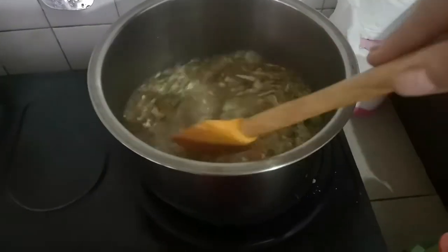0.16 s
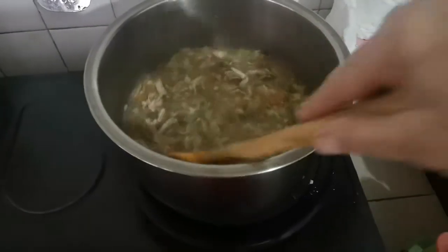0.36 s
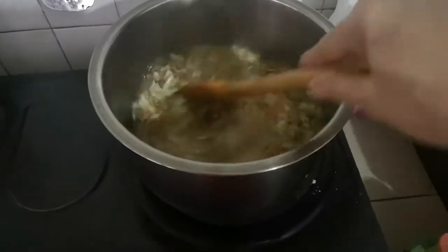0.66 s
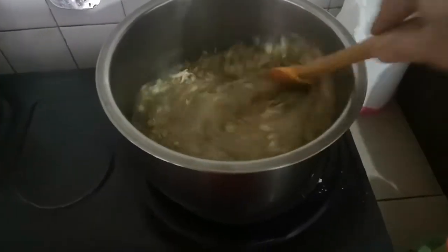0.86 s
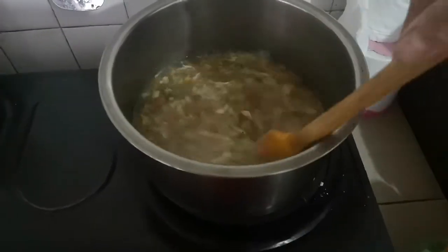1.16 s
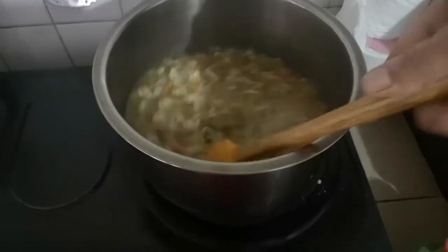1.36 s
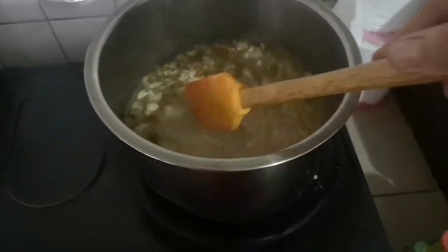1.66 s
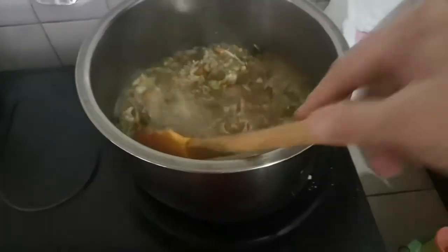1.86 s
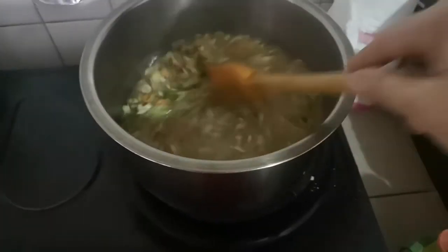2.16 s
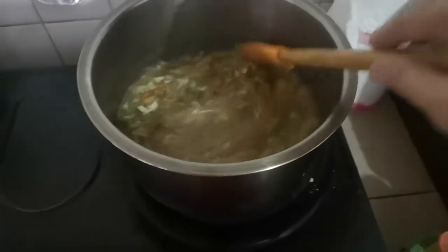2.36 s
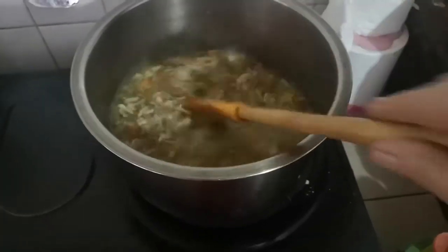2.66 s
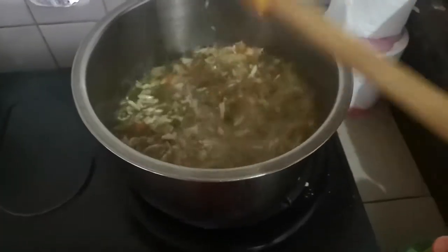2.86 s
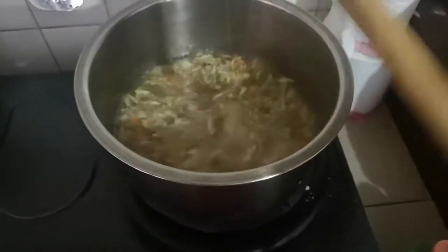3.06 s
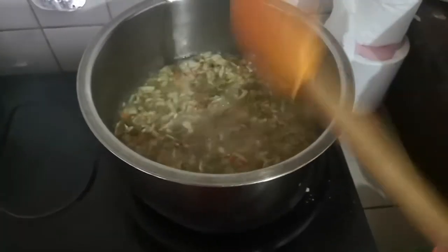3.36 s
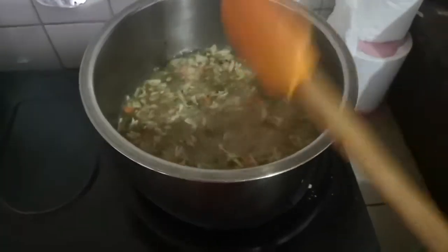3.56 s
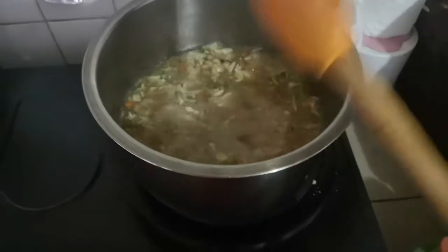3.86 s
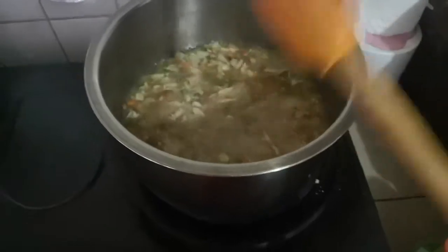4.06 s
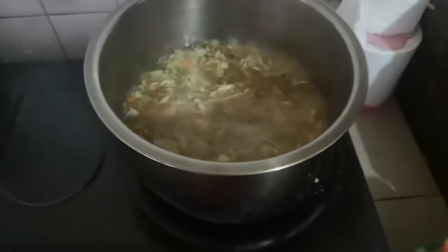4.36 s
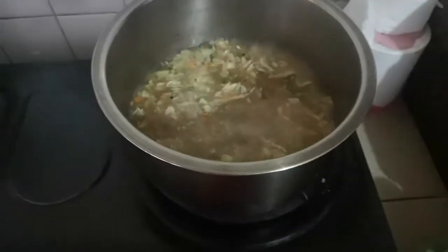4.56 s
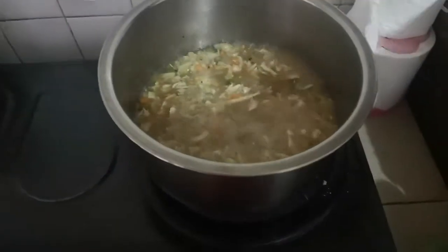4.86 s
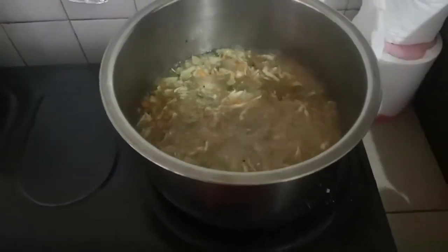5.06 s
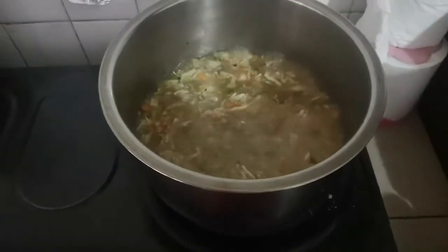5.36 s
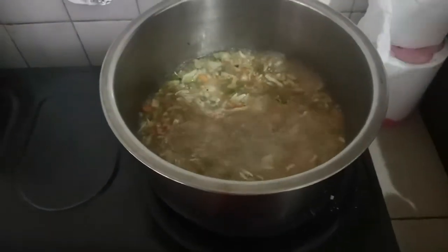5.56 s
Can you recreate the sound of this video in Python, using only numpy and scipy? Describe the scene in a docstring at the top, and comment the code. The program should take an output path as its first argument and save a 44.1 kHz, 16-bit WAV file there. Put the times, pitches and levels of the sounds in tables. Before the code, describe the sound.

Soup boils and bubbles in a steel pot while a wooden spoon stirs and knocks the wall; a loud metal clang rings at the end.

```python
"""Soup boils in a steel pot on a kitchen hob: rumble and hiss of shaped noise, swarms of short ringing bubbles.
A wooden spoon stirs and knocks the pot: damped modes over noise thuds. A wave of soup hisses up the hot wall
and the spoon drags along it in stick-slip jerks. Stirring keeps the boil calm; with the spoon out it returns.
At the end a steel thing, perhaps the lid, scuffs along, is struck twice in quick succession and rings."""
import sys
import numpy as np
from scipy import signal
from scipy.fft import rfft, irfft
from scipy.io import wavfile
from scipy.ndimage import uniform_filter1d

SR = 44100
rng = np.random.default_rng(int(sys.argv[2]) if len(sys.argv) > 2 else 0)


def dump_mix(stems):
    """Bounce the given channels to the path in sys.argv[1] as a 16-bit WAV at rate SR."""
    frames = np.atleast_2d(stems).T  # one column per channel
    limited = np.clip(frames, -1, 1)  # hard clip at full scale
    pcm = np.round(limited * 32767).astype(np.int16)
    wavfile.write(sys.argv[1], SR, pcm)


N = 252252
TIME_S = np.arange(N) / SR

# Spectrum shapes, overall level set elsewhere: frequency_hz, relative_db [dB per Hz]
RUMBLE_SPECTRUM = [(15, -11), (25, -2), (33, -10), (54, 2), (68, -0.5), (88, -11), (112, -6.5), (133, -3.5),
                   (155, -15), (180, -14.5), (225, -27), (300, -23.5), (470, -36), (800, -55)]
SIMMER_SPECTRUM = [(250, -10.5), (500, -3.5), (1000, -10.5), (1320, 2), (1600, -4), (1850, 2.5), (1950, 7),
                   (2150, -1), (2600, 1.5), (3100, -4.5), (4400, -9.5), (6000, -39)]
FIZZ_SPECTRUM = [(3500, -10.5), (5200, -15), (5900, -4), (6400, -8.5), (8000, -4.5), (9200, -7.5),
                 (10300, -17.5), (12500, -20.5), (15500, -23)]
SPLASH_SPECTRUM = [(530, -30), (900, -28), (1110, -15), (1230, -0.5), (1500, -9.5), (2640, -2), (2860, -4),
                   (3180, -6), (5000, -12), (6500, -39), (11000, -120)]
HISS_SPECTRUM = [(2500, -16), (4000, -21), (5200, -11), (6500, 0), (8000, -0.5), (9500, -8.5), (11500, -22),
                 (15500, -25)]
THUD_SPECTRUM = [(90, -19.5), (170, -17), (260, -7.5), (335, -0.5), (420, -4.5), (500, -16), (900, -41),
                 (2000, -57)]
JOLT_SPECTRUM = [(90, -46), (165, 4.5), (210, 9), (260, 5), (330, 5), (500, -6), (800, -7), (1200, -6.5),
                 (2000, -17.5), (3500, -26), (6000, -54)]
RUB_SPECTRUM = [(250, -5.5), (400, -14), (600, -6.5), (1000, -10), (1250, 1.5), (1450, -4), (1620, 7),
                (1950, -10), (2300, -11), (4500, -20), (7400, -18), (11000, -35)]
CLASH_SPECTRUM = [(300, -19), (700, -3.5), (1300, 1), (2100, 13), (2900, -8), (3500, -19), (4200, -14),
                  (4700, 0), (6400, -11), (9000, -33), (14000, -47)]
# Pot nearer the left microphone: frequency_hz, left_minus_right_db
POT_LEAN = [(380, 1), (700, 6), (1290, 5), (1950, 4), (2500, 11), (3500, 5.5), (5000, -1.5), (6000, 4),
            (8000, 4), (9300, 1.5), (15000, 3.5)]
# Kitchen decay: frequency_hz, t60_s
ROOM_DECAY = [(200, 0.39), (1500, 0.23), (4000, 0.32), (10000, 0.15)]
# Soup heaved by spoon or large steam pocket: middle_s, length_s, deep_lift_db, upper_lift_db
SURGES = [(0.97, 0.28, 6, 6.5), (1.15, .12, 6.5, 1.5), (3.18, .25, 9, -1.5), (3.6, 0.39, 5, 2.5),
          (4.2, 0.33, 8, -3), (5.1, 0.19, 5, 5), (5.46, 0.64, 2, 6.5)]
# Spoon strokes: the first barely alters the simmer, the later two churn up bubbles:
# middle_s, length_s, simmer_lift_db
STROKES = [(1.56, 0.75, -0.5), (2.12, 0.42, 3.5), (2.65, .34, 4.5)]
# Soup wetting the hot wall: middle_s, length_s, fizz_lift_db
SIZZLES = [(.09, 0.083, 4), (.69, 0.16, 2), (1.18, 0.086, 3), (3.25, 0.15, 5), (4.58, 0.26, 3)]
# Large bubbles bursting: start_s, relative_peak_db, pitch_hz
POPS = [(0.031, -34, 1300), (.044, -34.5, 1256), (.099, -41, 3600), (.835, -44, 1275), (0.9884, -34, 1900),
        (1.543, -36, 2890), (1.5918, -38.5, 1360), (1.6748, -33.5, 1800), (2.199, -31, 2700),
        (2.5628, -41, 1370), (2.597, -41.5, 1470), (2.6357, -45, 1880), (2.852, -40.5, 2640),
        (3.353, -43, 1300), (3.018, -49, 1270), (3.451, -35.5, 1340), (3.5641, -35, 2610),
        (3.7125, -39, 1900), (4.2933, -37.5, 1290), (4.5034, -39.5, 2580), (4.547, -43, 1280),
        (5.222, -47, 1240), (5.437, -42, 1050)]
# Drops spitting on hot steel: start_s, relative_peak_db
SPITS = [(0.942, -31), (0.9904, -25), (1.1707, -29), (1.2723, -34), (1.5903, -36), (3.081, -36),
         (3.235, -33.5), (4.1897, -30), (4.382, -30), (4.5208, -34)]
# Soup washing up the hot wall: time_s, relative_splash_db, relative_hiss_db
WAVE = [(0.82, -61, -76), (0.826, -49.5, -48), (0.91, -41.5, -49.5), (0.938, -40.5, -34.5),
        (1.01, -49.5, -50), (1.015, -54.5, -55)]
# Spoon against the pot, relative levels: start_s, clack_db, thud_db, jolt_db, wall_ring_db
KNOCKS = [(0.0377, -16.5, -55, -45.5, -24), (0.3615, -21, -63, -33, -10), (0.3631, -1.5, -33.5, -29.5, 5),
          (1.0279, -1, -34, -64, 3.5), (1.3263, -34, -58, -39.5, -20), (1.335, -38, -44, -50, -37)]
# Wood on steel, short modes: frequency_hz, relative_db, t60_s
CLACK_MODES = [(1220, -15.5, 0.04), (1660, -13.5, 0.014), (1984, -17, 0.021), (2510, -22, 0.019),
               (3350, -20.5, 0.0052), (6240, -24.5, 0.0036), (7400, -31, 0.021)]
# Pot wall modes: frequency_hz, relative_db, t60_s
WALL_MODES = [(1165, -47, .25), (1330, -45, .25), (1378, -49, .4), (1497, -47, 1.25), (1580, -42, .28),
              (1622, -46, .3), (1955, -45, .25)]
# Spoon dragging along the wall: time_s, level_db
DRAG = [(1.03, -77), (1.045, -51), (1.11, -46), (1.15, -48.5), (1.22, -57), (1.3, -54), (1.4, -81)]
# Lid shifted before it is struck: time_s, relative_db
SHIFT = [(5.28, -75), (5.31, -65), (5.355, -52), (5.38, -43), (5.41, -48), (5.445, -50), (5.49, -62),
         (5.54, -52)]
# Lid modes, damped while it slides: frequency_hz, relative_db, t60_s
SCUFF_MODES = [(399, -14.5, 0.19), (1140, -6, 0.025), (1900, 1.5, 0.0079), (2634, -12.5, 0.19),
               (3130, -11, 0.025), (3630, -17, 0.069)]
# Blows on the lid: start_s, relative_db
CLANGS = [(5.5447, -18), (5.549, 7)]
# Lid modes: frequency_hz, level_db, t60_s, left_minus_right_db, right_lag_cycles
LID_MODES = [(395, -61, 0.75, -5, 0.21), (721, -47, 0.57, -7, 0.33), (1240, -40, 3.0, 1, 0.35),
             (1303, -37, 1.36, 1, 0.4), (1381, -39, 1.0, 4, 0.25), (1632, -43, 3.0, 4, 0.39),
             (1736, -39, 1.23, 4, 0.28), (1806, -40, 1.95, -1, 0.28), (1965, -38, 3.0, 8, 0.18),
             (2038, -35, 2.37, 3, 0.33), (2053, -35, 2.37, 3, 0.33), (2109, -33, 3.0, 7, 0.38),
             (2288, -32, 0.32, 12, 0.23), (2541, -45, 3.0, 3, 0.18), (2716, -26, 0.45, -1, 0.04),
             (2850, -27, 0.35, 10, 0.11), (3289, -41, 0.34, 6, 0.34), (4603, -46, 0.34, -7, 0.33),
             (4633, -36, 0.3, -7, 0.32), (4800, -50, 0.34, -7, 0.16), (5297, -40, 0.28, -13, 0.25),
             (5739, -48, 0.5, 5, 0.24), (6368, -49, 0.4, -7, 0.15)]

# Calm share at the start (0-1), spoon lifted, time constant of the heat bringing the boil back
CALM_AT_START, LIFT_S, RECOVER_S = 0.83, 2.93, 0.89
# Level at full boil, and how far full calm lowers it
RUMBLE_DB, RUMBLE_CALM_DB = -44.5, 1
SIMMER_DB, SIMMER_CALM_DB = -54, 4.5
FIZZ_DB, FIZZ_CALM_DB = -52, 3.5
# Lull behind each stroke: delay, then depth per layer as a share of the stroke's lift
LULL_AFTER_S, LULL_SIMMER, LULL_FIZZ, LULL_RUMBLE = 0.32, 1, 0.53, 0.42
# Share of the rumble's chance swells evened out (0-1), averaging length, top of the deep part
RUMBLE_EVEN, RUMBLE_SWELL_S, DEEP_HZ = 0.36, 0.125, 83
SPIT_HZ = 7790
RIGHT_LATE_S = 0.00062
EDGE_HZ = 15450


def gain_of(db):
    """Amplitude factor for a level in dB."""
    return 10 ** (np.asarray(db) / 20)


def evened(x):
    """Scales a stereo pair so that its middle has rms 1."""
    return x / np.sqrt(np.mean(x.mean(0) ** 2) + 1e-20)


def read(points, hz):
    """Curve value at any frequency, straight on a log axis."""
    point_hz, value = np.transpose(points)
    return np.interp(np.log(hz + 1), np.log(point_hz + 1), value)


def level(rows, column=1):
    """One dB column of a time curve as a gain for every sample."""
    rows = np.array(rows)
    return gain_of(np.interp(TIME_S, rows[:, 0], rows[:, column]))


def swells(rows, late_s=0, column=2):
    """Sum of smooth swells, one per row, each as high (or, if negative, as deep) as its dB column."""
    total_db = 0
    for row in rows:
        place = np.clip((TIME_S - late_s - row[0]) / row[1], -0.5, 0.5)
        total_db = total_db + row[column] * np.cos(np.pi * place) ** 2
    return total_db


def calm():
    """How far stirring has calmed the boil, 0-1, for every sample."""
    stirred = np.interp(TIME_S, [0, LIFT_S], [CALM_AT_START, 1])
    return stirred * np.exp(-np.maximum(TIME_S - LIFT_S, 0) / RECOVER_S)


def add(mix, start_s, sound):
    """Adds a sound into the mix in place, cut off at the end."""
    part = mix[:, round(start_s * SR):][:, :sound.shape[1]]
    part += sound[:, :part.shape[1]]


def panned(left_minus_right_db):
    """Left and right gains of constant power for a level difference."""
    pair = gain_of([[left_minus_right_db / 2], [-left_minus_right_db / 2]])
    return pair / np.sqrt(np.mean(pair ** 2))


def from_left(x):
    """The soup's surface is nearer the left microphone, so the right one hears it a little later."""
    late = round(RIGHT_LATE_S * SR)
    return np.array([x[0], np.pad(x[1], (late, 0))[:N]])


def colour(x, spectrum, size=8192):
    """Causal minimum-phase filter with the given spectrum and the pot's lean to one side."""
    hz = abs(np.fft.fftfreq(size, 1 / SR))
    # the lean fades out towards the bass
    lean_db = read(POT_LEAN, hz) * np.clip(hz / POT_LEAN[0][0], 0, 1) ** 2
    log_gain = np.log(gain_of(read(spectrum, hz) + np.outer([0.5, -0.5], lean_db)))
    response = np.exp(np.conj(signal.hilbert(log_gain)))
    taps = np.fft.ifft(response).real[:, :size // 2]
    return signal.oaconvolve(x, taps, axes=1)[:, :x.shape[1]]


def noise(likeness):
    """White noise, partly shared by the two microphones (0-1)."""
    shared = np.clip(likeness, 0, 1)
    common = np.sqrt(shared) * rng.standard_normal(N)
    return common + np.sqrt(1 - shared) * rng.standard_normal((2, N))


def drift(hz):
    """Slow chance of rms 1: noise falling off above the given frequency."""
    falloff = 1 + (np.fft.rfftfreq(N, 1 / SR) / hz) ** 2
    slow = irfft(rfft(rng.standard_normal(N)) / falloff, N)
    return slow / slow.std()


def slips(per_s):
    """Tiny jerks of a surface that sticks and slips."""
    return rng.standard_normal(N) * (rng.random(N) < per_s / SR)


def ring(modes, t, apart_cycles):
    """Dying sines of alternating sign, a little out of step at the two microphones."""
    out = np.zeros((2, len(t)))
    for k, (hz, db, t60_s) in enumerate(modes):
        phase_cycles = k / 2 + np.array([[0], [apart_cycles * rng.standard_normal()]])
        out += gain_of(db - 60 * t / t60_s) * np.sin(2 * np.pi * (hz * t + phase_cycles))
    return out * (1 - np.exp(-(t / 0.000052) ** 2))  # nearly instant, hard onset


def bubble(hz, cycles, snap):
    """A film snaps and the cavity under it rings briefly; each microphone hears its own phase."""
    t = TIME_S[:900]
    fade = np.exp(-t * hz / cycles) * (1 - np.exp(-2 * t * hz))
    tone = np.sin(2 * np.pi * (hz * t + 0.4 * rng.random((2, 1))))
    band = signal.butter(2, [hz * 0.65, min(hz * 1.4, SR * 0.45)], "band", fs=SR)
    spray = signal.lfilter(*band, rng.standard_normal((2, len(t))))
    return signal.lfilter(*band, fade * (tone + snap * spray / spray.std()))


def bubbling(low_hz, high_hz, per_s, spread_db, wash, clump_db, count=28):
    """Swarms of small bubbles, a few of them large, over the wash of countless tiny ones."""
    swarm = np.zeros((2, N))
    for hz in np.geomspace(low_hz, high_hz, count):
        size_db = spread_db * np.minimum(rng.exponential(1, N), 4)
        bursts = gain_of(size_db) * (rng.random(N) < per_s / count / SR)
        grain = bubble(hz, cycles=4.5, snap=0.7)
        swarm += signal.oaconvolve(bursts[None], grain * hz, axes=1)[:, :N]
    return (evened(swarm) + wash * evened(noise(0))) * gain_of(clump_db * drift(14))


def kitchen(x, slot=22):
    """Sparse echoes of random sign from tiles and walls, one per slot of samples, decay set by frequency."""
    taps = np.zeros((2, SR // 2))
    at = np.arange(10 * slot, SR // 2 - slot, slot)
    at = at + rng.integers(0, slot, (2, len(at)))
    np.put_along_axis(taps, at, rng.choice([-1., 1.], at.shape), 1)
    hz, t, bins = signal.stft(taps, SR, nperseg=256)
    decay = gain_of(-60 * t / read(ROOM_DECAY, hz)[:, None])
    tail = signal.istft(bins * decay, SR, nperseg=256)[1]
    return signal.fftconvolve(x.mean(0)[None], tail / np.linalg.norm(tail[0]), axes=1)[:, :N]


def rumble():
    """Steam pockets heave the soup and shake pot and hob; both microphones hear nearly the same."""
    low = evened(colour(noise(0.99), RUMBLE_SPECTRUM))
    power = uniform_filter1d(low.mean(0) ** 2, round(RUMBLE_SWELL_S * SR))
    low = low / power ** (RUMBLE_EVEN / 2)
    deep = signal.sosfiltfilt(signal.butter(2, DEEP_HZ, fs=SR, output="sos"), low)
    upper = low - deep
    heaved = deep * gain_of(swells(SURGES)) + upper * gain_of(swells(SURGES, column=3))
    lull_db = LULL_RUMBLE * swells(STROKES, LULL_AFTER_S)
    return heaved * gain_of(RUMBLE_DB - RUMBLE_CALM_DB * calm() - lull_db)


def boil():
    """Bubbles burst at the surface while fine spray fizzes on the hot steel."""
    simmer = bubbling(700, 4800, per_s=2200, spread_db=2.6, wash=1.1, clump_db=0.8)
    fizz = bubbling(4800, 14000, per_s=1900, spread_db=3.2, wash=1, clump_db=1)
    lull_db = swells(STROKES, LULL_AFTER_S)
    simmer_db = SIMMER_DB - SIMMER_CALM_DB * calm() + swells(STROKES) - LULL_SIMMER * lull_db
    fizz_db = FIZZ_DB - FIZZ_CALM_DB * calm() + swells(SIZZLES) - LULL_FIZZ * lull_db
    simmer = evened(colour(simmer, SIMMER_SPECTRUM)) * gain_of(simmer_db)
    fizz = evened(colour(fizz, FIZZ_SPECTRUM)) * gain_of(fizz_db)
    return (simmer + fizz) * gain_of(0.11 * drift(18))


def pops():
    """Single large bubbles and spits, each a brief cavity ring, stand out of the boil."""
    out = np.zeros((2, N))
    spits = [(start_s, peak_db, SPIT_HZ) for start_s, peak_db in SPITS]
    for start_s, peak_db, hz in [*POPS, *spits]:
        pop = bubble(hz, cycles=4, snap=0.6)
        add(out, start_s, gain_of(peak_db) * pop / abs(pop.mean(0)).max())
    out = signal.sosfilt(signal.butter(6, 9500, fs=SR, output="sos"), out)  # low-pass
    return out * panned(6)


def wave():
    """Soup runs up the hot wall: bubbly splash and a sputtering hiss as it boils off, then both die away."""
    splash = bubbling(1000, 5000, per_s=2500, spread_db=2.5, wash=0.8, clump_db=1)
    hiss = bubbling(4000, 15000, per_s=3000, spread_db=3, wash=0.9, clump_db=1)
    splash = gain_of(0.5) * evened(colour(splash, SPLASH_SPECTRUM)) * level(WAVE)
    hiss = gain_of(0.9) * evened(colour(hiss, HISS_SPECTRUM)) * level(WAVE, column=2)
    rise = np.clip((TIME_S - WAVE[0][0]) / 0.076, 0, 1)
    fall = np.exp(-np.maximum(TIME_S - WAVE[-1][0], 0) / 0.1)
    sputter = gain_of(1.3 * drift(170))
    return rise * fall * sputter * (splash + hiss)


def spoon():
    """Each knock clacks, rings the wall, thumps the full pot and jolts it on the hob; a drag sticks and slips."""
    out, t = np.zeros((2, N)), TIME_S[:SR]
    wall = ring(WALL_MODES, t, apart_cycles=0.057) * panned(10.5)
    thump = (1 - np.exp(-t / 0.003)) * np.exp(-t / 0.04)
    for start_s, clack_db, thud_db, jolt_db, wall_db in KNOCKS:
        clack = ring(CLACK_MODES, t, apart_cycles=0.27) * panned(6.4)
        thud = evened(colour(noise(0.95)[:, :SR], THUD_SPECTRUM))
        jolt = evened(colour(noise(0.83)[:, :SR], JOLT_SPECTRUM))
        body = (gain_of(thud_db) * thud + gain_of(jolt_db) * jolt) * thump
        add(out, start_s, gain_of(clack_db) * clack + body + gain_of(wall_db) * wall)
    rub = evened(colour(np.array([slips(700), slips(640)]), RUB_SPECTRUM))
    dragging = (TIME_S > DRAG[0][0]) * (TIME_S < DRAG[-1][0])
    return out + rub * level(DRAG) * dragging


def lid():
    """Stick-slip jerks scuff the damped lid; two blows clash as noise bursts and it rings on in many modes."""
    out, t = np.zeros((2, N)), TIME_S[:SR // 2]
    scuff = signal.oaconvolve(slips(500)[None], ring(SCUFF_MODES, t, apart_cycles=0.3), axes=1)
    out += evened(scuff[:, :N]) * level(SHIFT) * (TIME_S > SHIFT[0][0])
    for start_s, db in CLANGS:
        fade = np.exp(-t / 0.005) + 0.25 * np.exp(-t / 0.09)
        clash = evened(colour(noise(0.13), CLASH_SPECTRUM))[:, :len(t)]
        add(out, start_s, gain_of(db - 36.5) * fade * clash)
    onset = 1 - np.exp(-t / 0.002)
    for hz, db, t60_s, side_db, lag_cycles in LID_MODES:
        phase_cycles = rng.random() - np.array([[0], [lag_cycles]])
        tone = np.sin(2 * np.pi * (hz * t + phase_cycles)) * gain_of(db - 60 * t / t60_s)
        add(out, CLANGS[0][0], tone * panned(side_db) * onset)
    return out


def scene():
    """Soup, spoon and lid in a tiled kitchen; knocks, pops and lid feed its echoes."""
    bursts, knocks, steel = pops(), spoon(), lid()
    sent = gain_of(-4) * bursts + gain_of(-9) * knocks + gain_of(-15) * steel
    soup = rumble() + from_left(boil() + wave() + bursts)
    return kitchen(sent) + soup + knocks + steel


def record(dry):
    """The band limit of the recorder: a steep low-pass."""
    taps = signal.firwin(511, EDGE_HZ, window=("kaiser", 9), fs=SR)
    return signal.oaconvolve(dry, taps[None], "same")


dry = scene()
out = record(dry)
dump_mix(out)
```